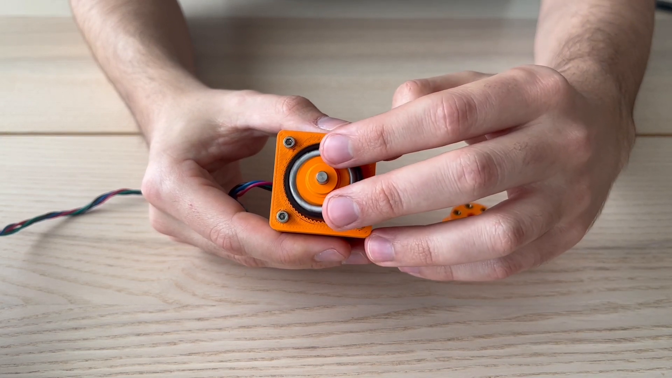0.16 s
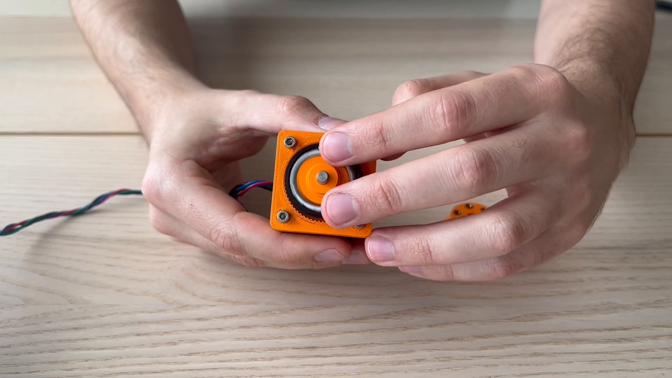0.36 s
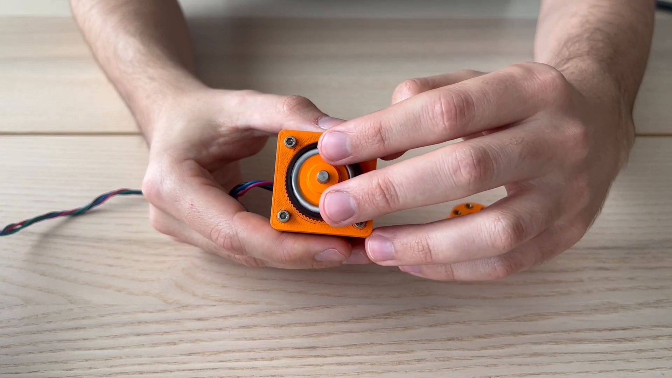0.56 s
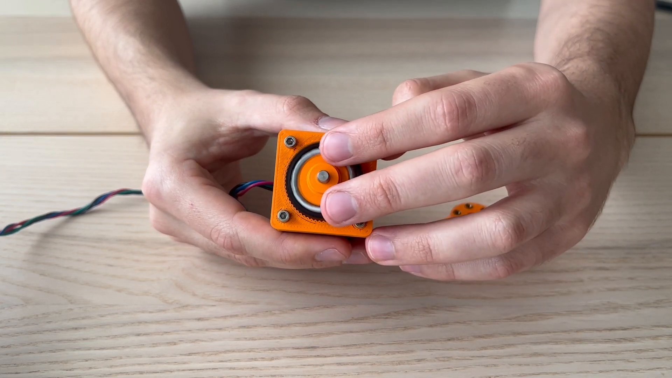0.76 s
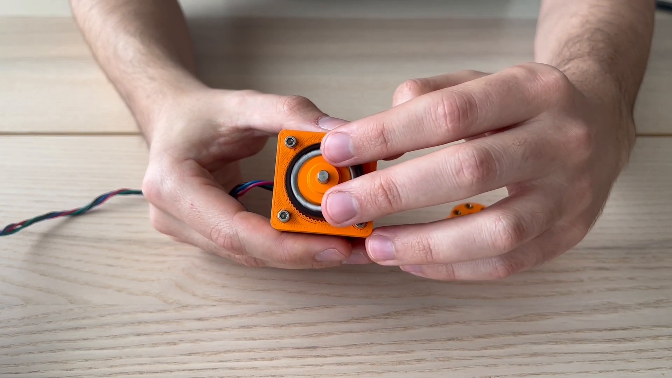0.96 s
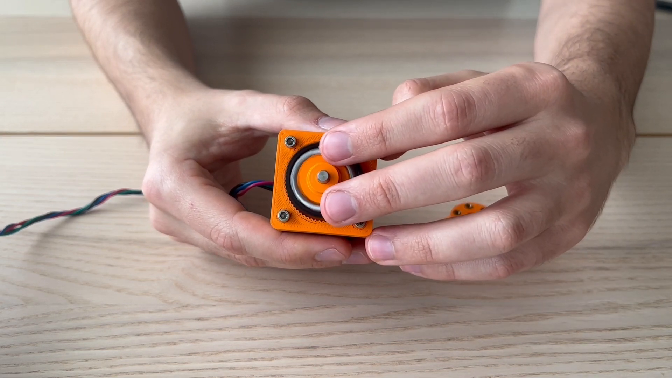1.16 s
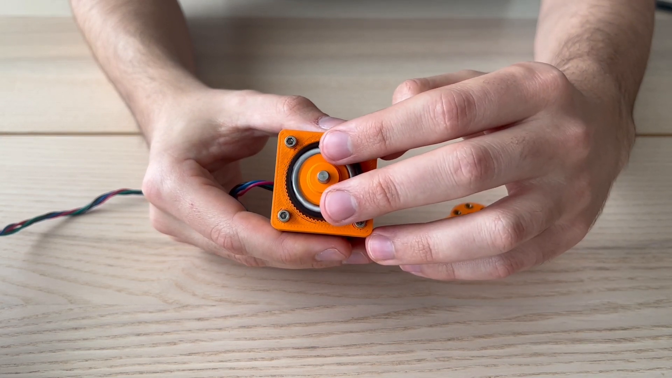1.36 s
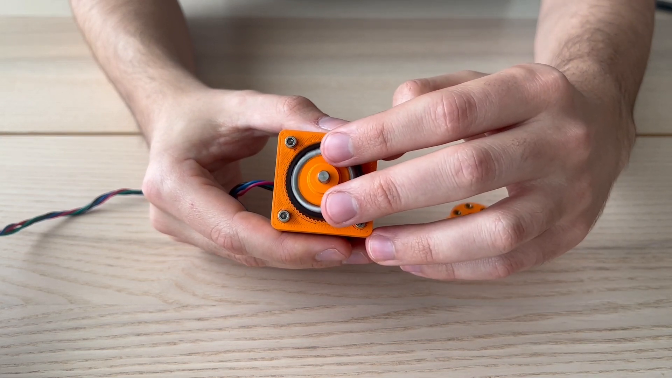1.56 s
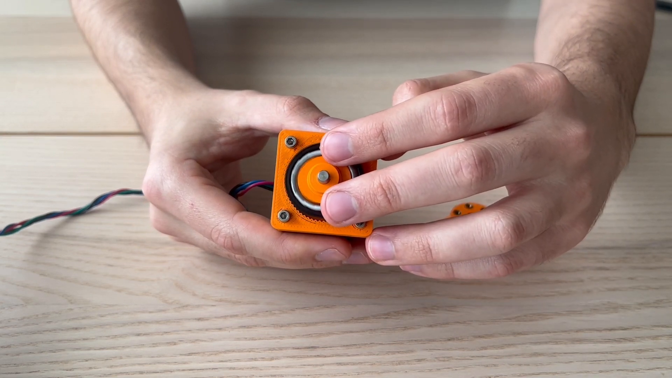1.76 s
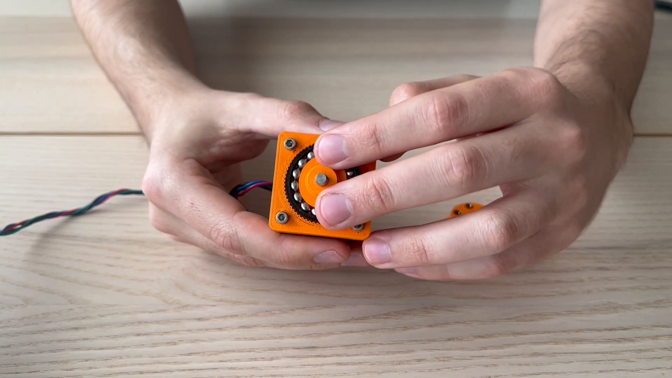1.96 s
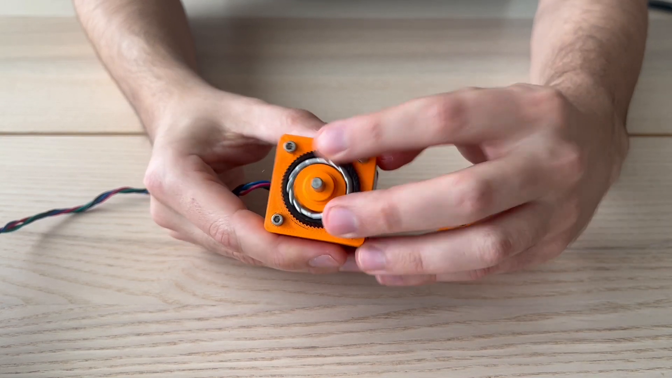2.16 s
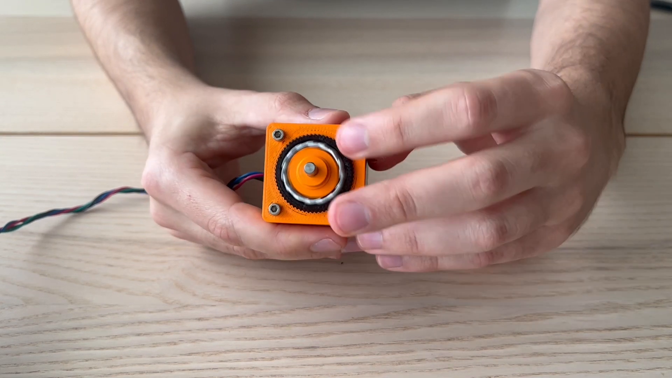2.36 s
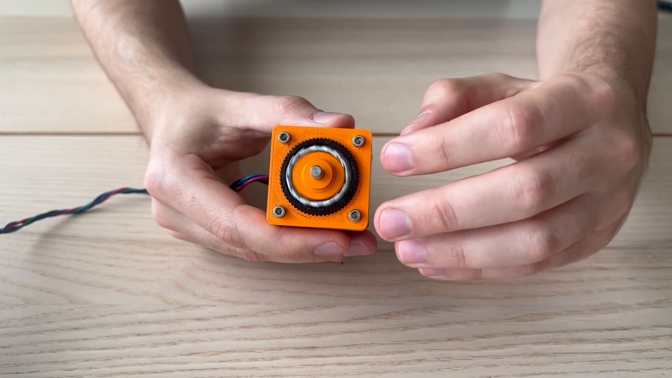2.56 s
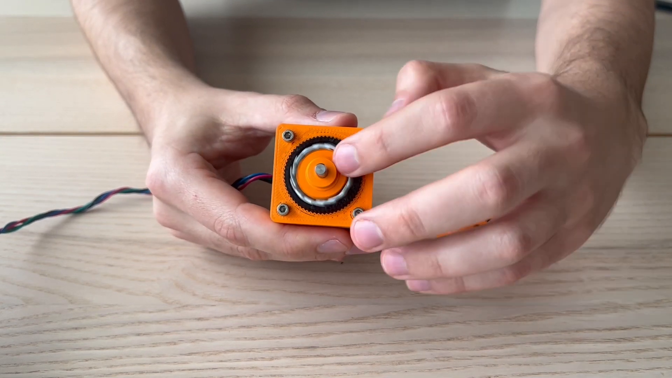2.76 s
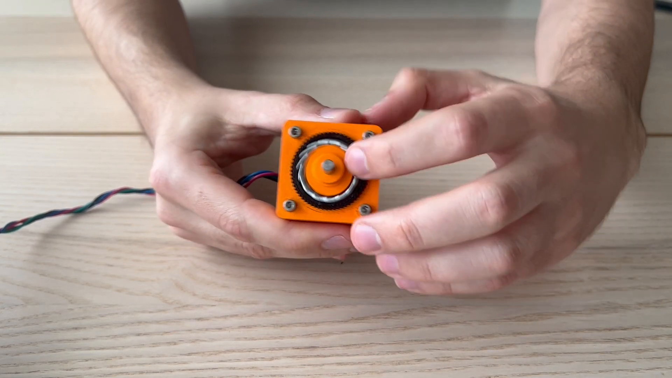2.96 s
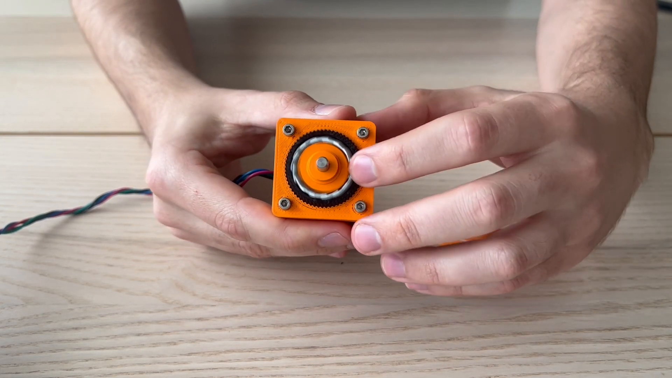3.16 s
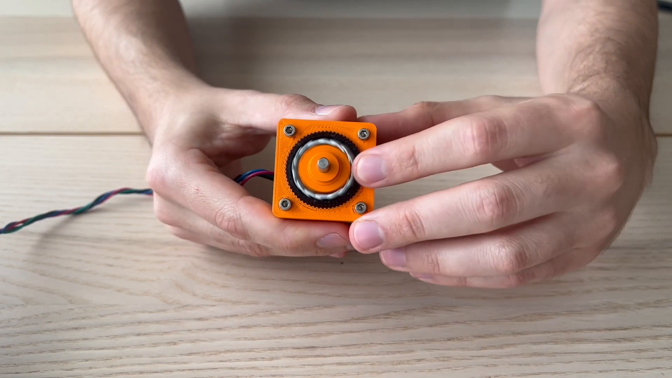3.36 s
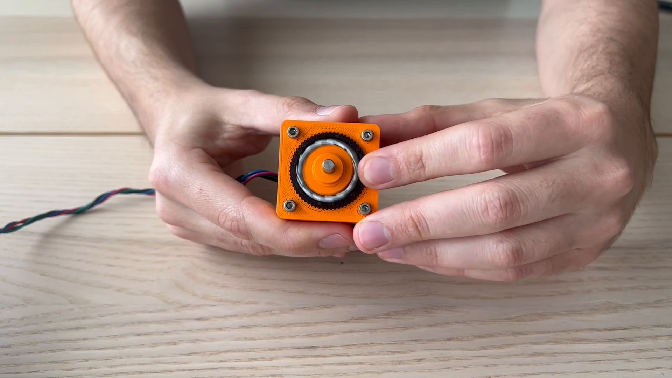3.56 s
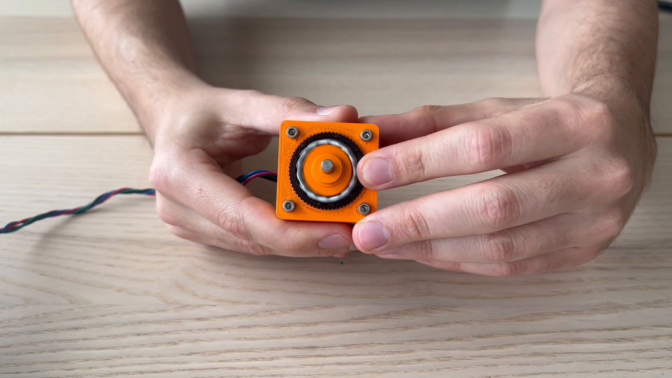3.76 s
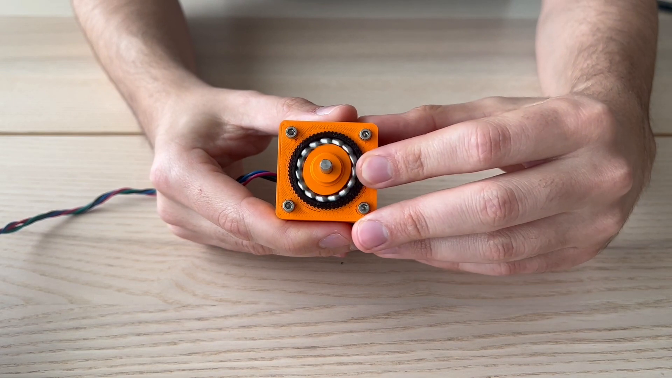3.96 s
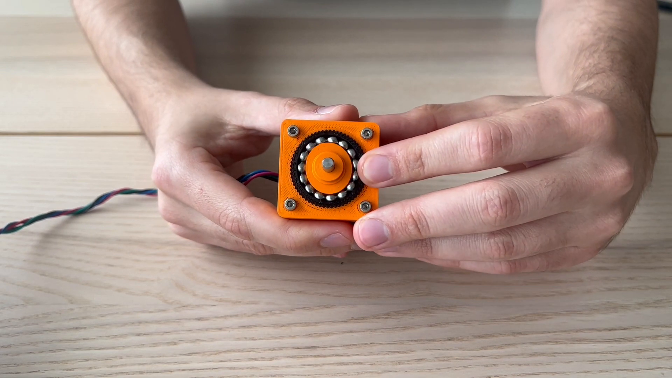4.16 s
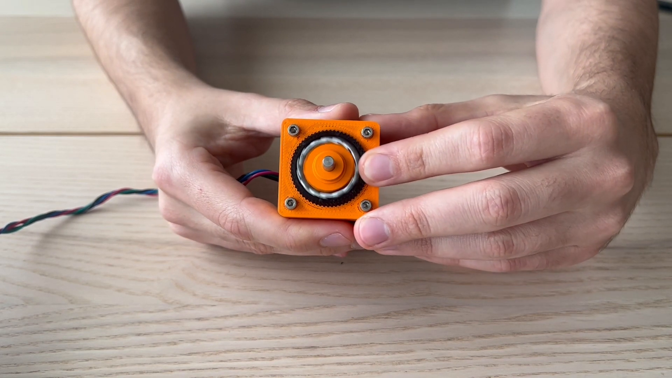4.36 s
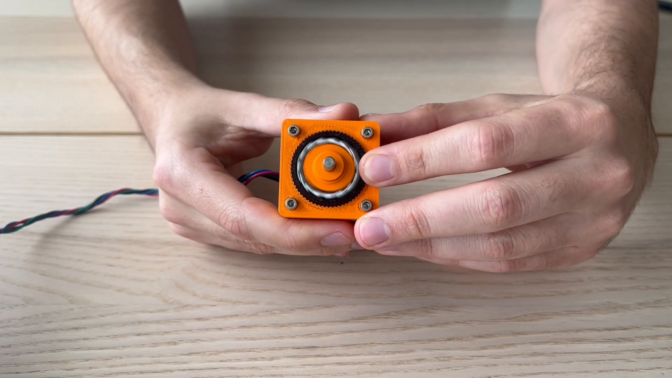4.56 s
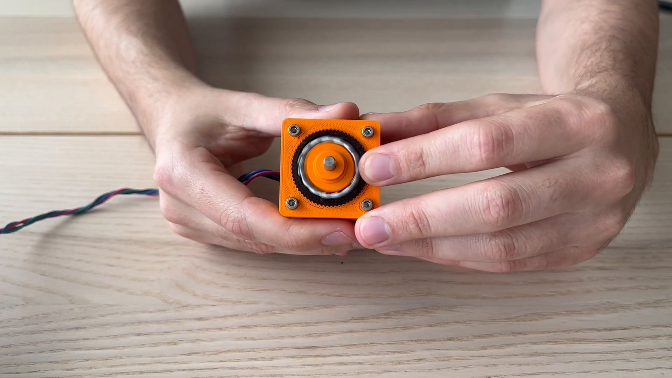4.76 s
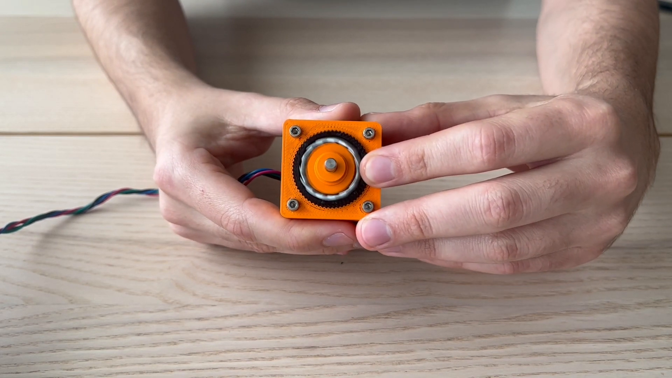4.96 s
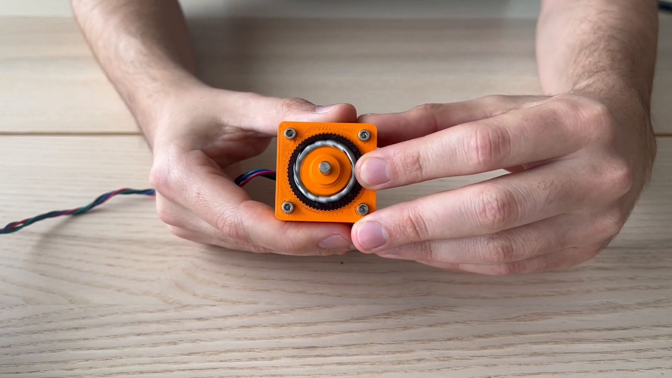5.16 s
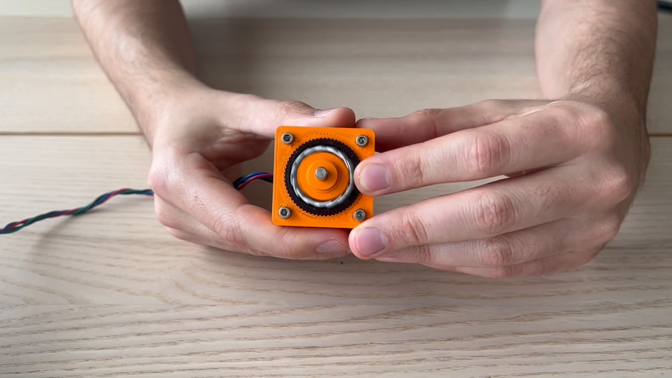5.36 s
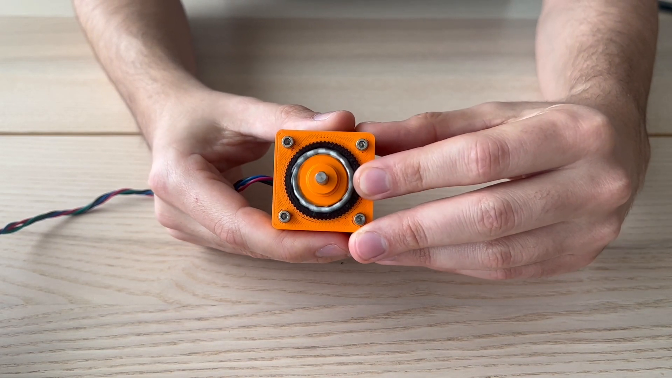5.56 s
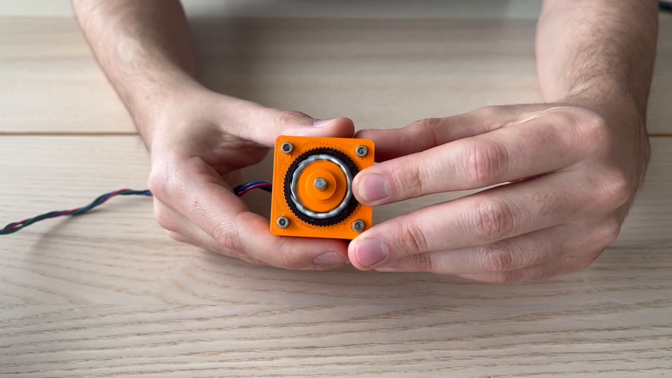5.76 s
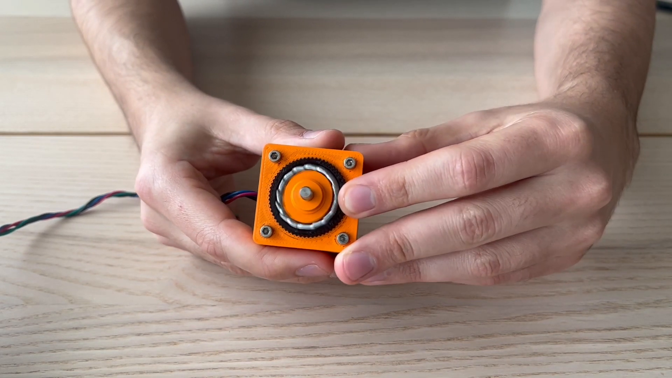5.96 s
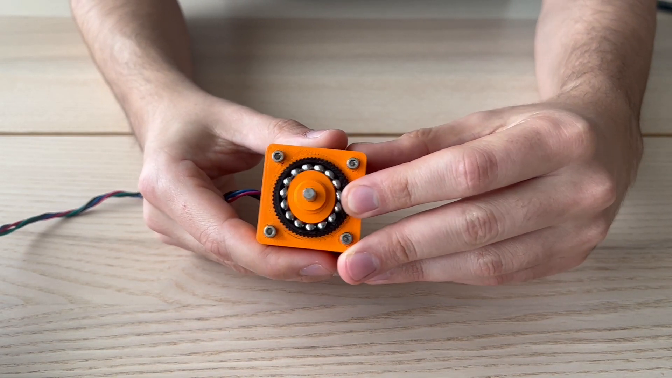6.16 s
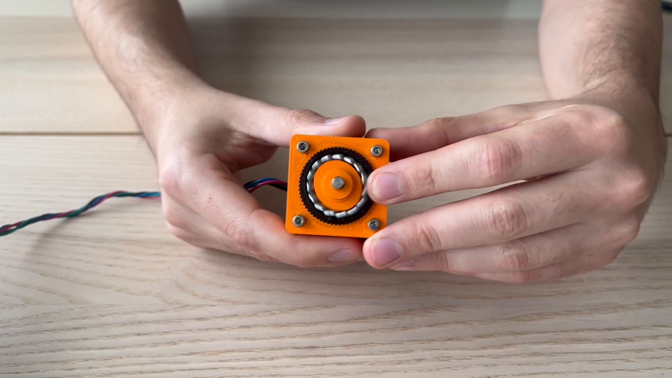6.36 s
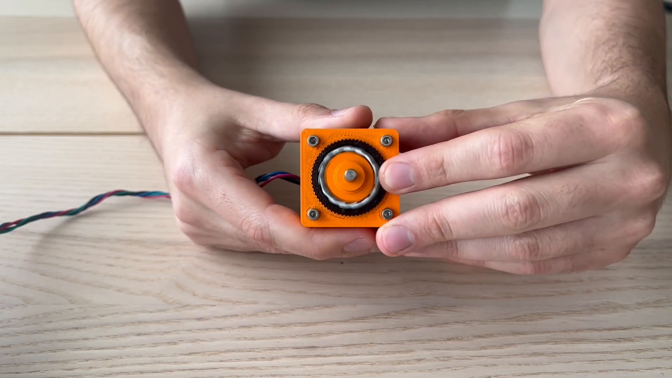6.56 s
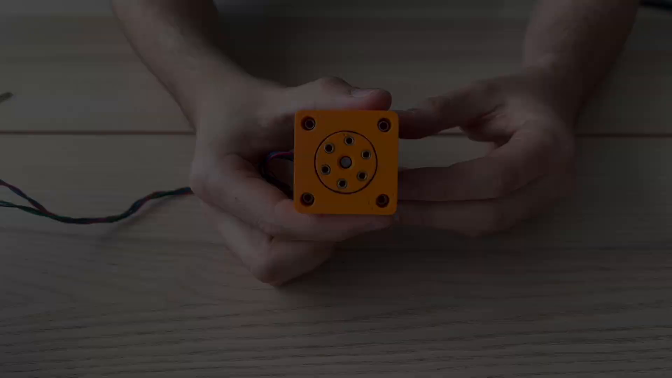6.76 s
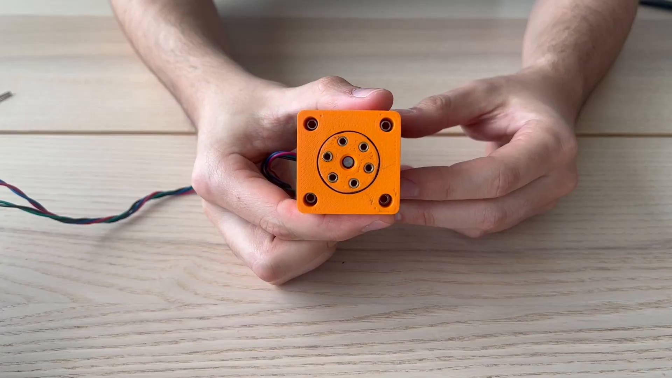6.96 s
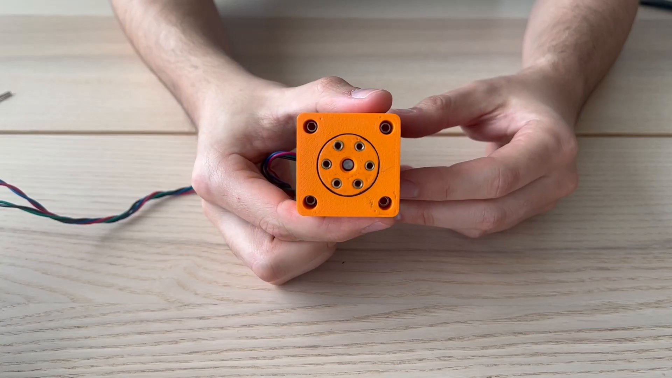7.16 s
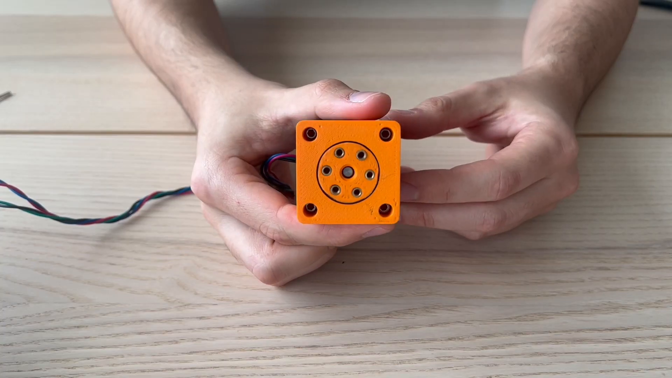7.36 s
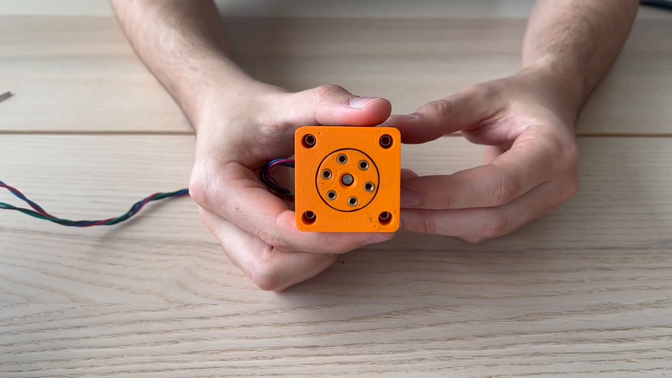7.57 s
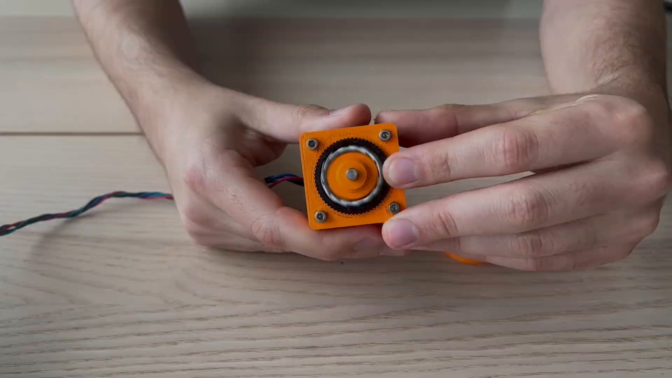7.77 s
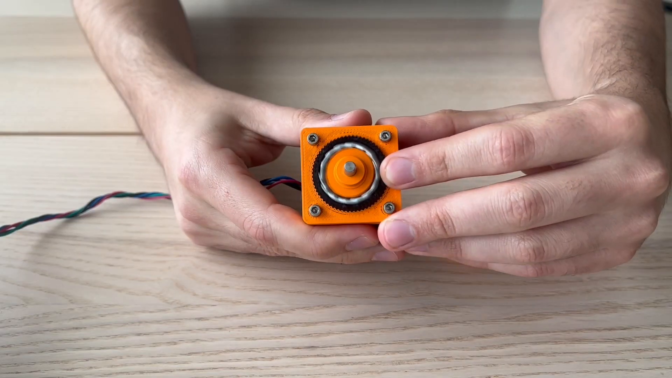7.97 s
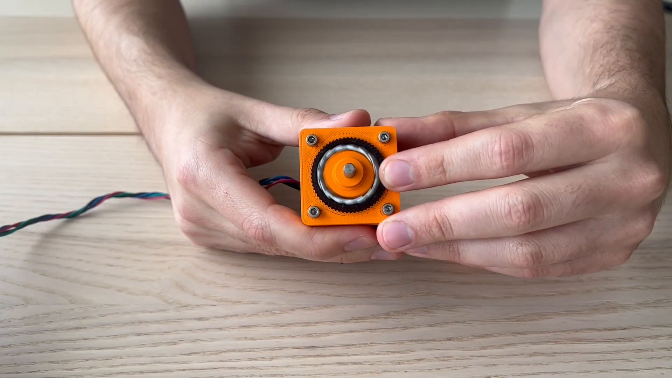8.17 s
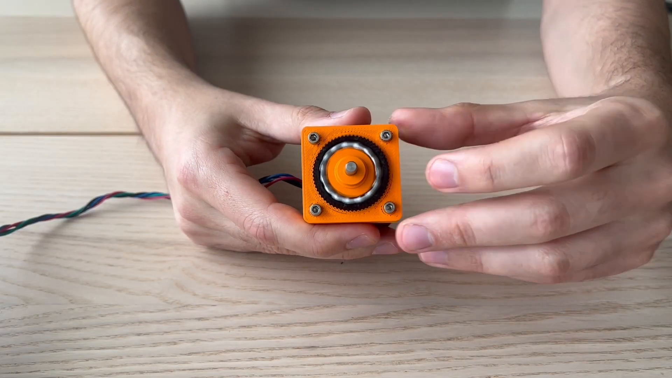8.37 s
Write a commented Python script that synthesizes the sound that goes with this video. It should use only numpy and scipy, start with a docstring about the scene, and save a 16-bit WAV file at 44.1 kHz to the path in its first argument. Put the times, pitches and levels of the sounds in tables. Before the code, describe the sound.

A small motor spins a plastic ball gearbox back and forth, steel balls rattling and clacking over a whine, then two short, quieter runs.

```python
"""Indoors, in a humming room, a two-port microphone close to an open plastic ball gearbox. A hand-held
stepper motor spins it back and forth: loose steel balls rattle and clack twice a turn, play in the gear
knocks the case, the coils whine. Some sound bounces off hands and table. Two short scenes follow:
the gearbox with its lid on, running fast, then an open, slow and quiet run."""
import sys
import numpy as np
from scipy import signal
from scipy.fft import rfft, irfft, next_fast_len
from scipy.io import wavfile
from scipy.ndimage import uniform_filter1d

SR = 44100
rng = np.random.default_rng(int(sys.argv[2]) if len(sys.argv) > 2 else 0)


def persist_wave(psi):
    """Save psi, clipped to +-1, as 16-bit WAV."""
    counts = np.round(np.clip(psi, -1, 1) * 32767).astype(np.int16)
    wavfile.write(sys.argv[1], SR, np.atleast_2d(counts).T)


N = 371322
TIME, FFT_SIZE = np.arange(N) / SR, next_fast_len(N + 4096)
FREQ = np.fft.rfftfreq(FFT_SIZE, 1 / SR)

SHAFT_HZ = 17.126  # at full speed
FIRST_STOP_S, RUN_S, RAMP_S = -.24, 2.14, .31  # the shaft brakes evenly and turns back every RUN_S

# one row per run between stops: (throb phase [rad], throb depth [dB], body rattle [dB],
# step whine at start [dB], at end [dB], upper twin tone [dB], coil tones [dB])
RUNS = [(3.05, 0.7, -18.5, -42, -44, -10, -43), (3.2, 1, -15, -43, -51, -7, -39),
        (4.9, 2.5, -13.5, -53, -53.5, 1.5, -41), (7.8, 0.5, -13.5, -50.5, -48, 4, -46)]
# rattle at full speed, as the fingers damp or free the gear: (time [s], level [dB])
RATTLE_LEVEL = [(0, -40), (.16, -31.5), (.3, -34.5), (.55, -33.5), (.88, -38), (.93, -32.5), (1.58, -36),
                (1.67, -36.5), (1.83, -24), (1.9, -28), (1.96, -21.5), (2.02, -28.5), (2.06, -20),
                (2.25, -23.5), (2.65, -23), (3.0, -24), (3.75, -24.5), (4.21, -28.5), (4.45, -28),
                (4.75, -28), (5.0, -28.5), (5.2, -27), (5.86, -28), (6.05, -27.5), (6.3, -26), (6.45, -26),
                (6.7, -26), (6.77, -28.5), (6.9, -58)]
# ring of the steel balls: (frequency [Hz], gain [dB])
BALL_COLOUR = [(5000, -17.5), (6500, -9.5), (8200, -6.5), (9600, 1.5), (10400, 0.5), (11500, 2), (12800, 3),
               (15000, 1)]
# ring of the plastic body: (frequency [Hz], gain [dB])
BODY_COLOUR = [(500, -14.5), (750, -12.5), (1100, -7), (1350, -9.5), (1880, -7), (2050, -0.5), (2300, -3.5),
               (3200, 0), (3420, 1.5), (3750, 1.5), (4100, -3), (4600, -7), (6200, -1), (8000, -1),
               (10000, -11)]
# balls tumble over while the shaft creeps: (time [s], level [dB], decay [s])
TUMBLES = [(1.859, -30, 0.013), (1.941, -30.5, 0.0062), (2.0415, -7, 0.0063), (5.921, -29, 0.005),
           (6.011, -27, 0.0067), (6.112, -43, 0.02), (6.144, -35.5, 0.0072), (6.207, -33, 0.013)]
# hard clacks, often two or three to a half turn: (time [s], strength [dB])
HARD_CLACKS = [(1.9434, -27), (2.0421, 2), (2.1397, -10), (2.2188, -21), (2.2562, -21), (2.2628, -13),
               (2.3207, -13), (2.433, -15), (2.4382, -9), (2.4965, -7), (2.5048, -17), (2.5274, -16),
               (2.5575, -19), (2.614, -15), (2.6712, -15), (2.7783, -17), (2.819, -19), (2.8705, -16),
               (2.8884, -22), (2.98, -22), (2.991, -15), (3.0171, -18), (3.0215, -17), (3.0897, -17),
               (3.0973, -17.5), (3.1361, -19), (3.3082, -18), (3.3153, -18), (3.4778, -21), (3.4867, -24),
               (3.5957, -27), (3.6634, -24), (3.7186, -18), (3.7533, -23), (3.8209, -23), (3.871, -25),
               (3.8767, -28), (3.8956, -27), (3.9703, -25), (3.9741, -29), (4.001, -24.5), (4.0057, -24),
               (4.068, -30), (4.0786, -30), (4.0926, -32), (4.12, -31), (4.1922, -25.5), (4.2137, -33),
               (4.2243, -34), (4.233, -25), (4.2434, -30), (4.2624, -28), (4.2691, -31), (4.2812, -26),
               (4.337, -24), (4.3447, -28), (4.3953, -22), (4.4056, -20.5), (4.4455, -22), (4.4539, -21),
               (4.4648, -19), (4.4932, -25), (4.5432, -24.5), (4.5663, -27), (4.5763, -25), (4.5974, -23),
               (4.6305, -20.5), (4.6853, -16), (4.6887, -20.5), (4.7017, -21), (4.7162, -15.5),
               (4.7479, -20), (4.7787, -19), (4.8032, -25), (4.8094, -19), (4.838, -21), (4.8423, -29),
               (4.8643, -16.5), (4.8722, -23), (4.8957, -23), (4.9217, -23), (4.929, -25), (4.9577, -28),
               (4.9819, -27), (4.9876, -28), (5.0161, -24), (5.0369, -25), (5.0411, -24), (5.0733, -19),
               (5.1271, -20), (5.1568, -15), (5.184, -16.5), (5.1941, -24), (5.222, -15.5), (5.2455, -15.5),
               (5.2572, -31), (5.2724, -22), (5.2804, -19), (5.3076, -21), (5.3332, -19), (5.3994, -28),
               (5.454, -18), (5.4732, -21), (5.4796, -24), (5.5058, -16.5), (5.5367, -17), (5.5676, -18.5),
               (5.5722, -21), (5.5955, -18), (5.603, -25), (5.6234, -18), (5.6306, -17.5), (5.6883, -16),
               (5.7164, -28), (5.741, -22), (5.7786, -23), (5.7985, -19), (5.826, -17), (5.865, -18),
               (5.8869, -16), (5.8955, -20), (5.9221, -26), (5.9303, -12.5), (5.9359, -30), (5.9563, -26),
               (5.961, -18), (5.9711, -19), (6.0106, -19), (6.0255, -19), (6.0902, -14), (6.1196, -29),
               (6.1403, -23.5), (6.147, -32), (6.2025, -26), (6.2082, -20), (6.2161, -25), (6.2208, -28),
               (6.2394, -27), (6.2433, -26), (6.2501, -32), (6.278, -31), (6.3142, -26), (6.3256, -25),
               (6.4051, -28), (6.413, -27), (6.445, -19), (6.4535, -19), (6.6187, -18), (6.6461, -20),
               (6.6572, -18), (6.684, -20), (6.7039, -24), (6.7321, -22)]
# neighbours jostle after a snap, more as the cage runs loose: (time [s], jostle [dB], leading tick [dB])
JOSTLE = [(0, -26, 6), (2.1, -26, 6), (2.3, -21, 14), (3.9, -24, 11), (4.4, -10, 0), (5.8, -9.5, 0),
          (5.9, -18, 4), (6.2, -19, 0)]
# stretches of regular soft clacks and knocks: (start [s], end [s], clack strength [dB], knock lag [s])
BEATS = [(2.2613, 3.85, -26, .0005), (4.3371, 5.87, -26, .007), (6.4454, 6.76, -29, .05)]
# knocks on the case, hardest around the stops: (time [s], strength [dB])
KNOCKS = [(1.942, -26), (2.042, -9), (2.258, -49), (2.312, -39), (2.379, -35), (2.438, -31), (2.496, -27.5),
          (2.551, -38), (2.612, -44), (2.661, -37), (2.719, -39), (2.841, -47), (2.897, -36), (2.961, -37),
          (3.013, -35), (3.072, -42), (3.165, -41), (3.249, -36), (4.075, -45), (4.693, -45),
          (4.754, -41.5), (4.811, -41), (4.866, -42), (5.043, -40), (5.162, -36), (5.221, -32),
          (5.28, -35.5), (5.454, -36), (5.513, -34), (5.571, -32.5), (5.629, -35), (5.689, -35),
          (5.805, -36), (5.864, -36), (5.923, -36), (5.931, -28), (6.023, -30.5), (6.324, -40),
          (6.785, -42)]
# modes of the case: (frequency [Hz], gain [dB], t60 [s])
CASE_MODES = [(485, -2, 0.03), (658, 5, 0.015), (753, 5, 0.026), (968, 6, 0.022), (1130, 2, 0.024),
              (274, -15, 0.07), (136, -9.5, 0.074)]
# the grip damps or frees the middle case modes: (time [s], gain [dB])
GRIP = [(2.04, -1), (2.2, -10), (3.85, -7), (4.2, 5.5), (6.8, -3)]
# coil tones: (frequency [cycles per turn], level [dB])
COIL_TONES = [(50, -27), (150, -22), (217.5, -17), (250, -19), (300, -29), (350, -24), (400, -18),
              (401, -17), (550, -11), (600, -17), (700, -15), (750, -13)]
# frame resonances that the step whine glides through: (speed [share of full], gain [dB])
FRAME_GAIN = [(0, -45), (.5, -24), (.6, -9), (.67, -16), (.76, -19), (.83, -7), (.89, -20), (.94, -6),
              (1, 0)]
# lid on: (time [s], grind [dB], hum [dB])
LID_LEVELS = [(6.75, -22, -48), (6.85, -47, -55), (6.905, -42, -53), (6.925, -58, -48), (6.955, -45.5, -39),
              (7.0, -43.5, -45), (7.11, -36, -73), (7.3, -37, -65), (7.67, -35.5, -63), (7.76, -43, -61),
              (7.85, -44, -71)]
# grind heard through the lid: (frequency [Hz], gain [dB])
LID_COLOUR = [(71, -56), (120, -14), (147, 1), (282, -4.5), (451, -2), (499, -5.5), (735, -5), (1150, -6),
              (1550, -3.5), (1900, -5), (2340, -11), (2750, -9), (5630, -5.5), (6100, -4.5), (6900, -8),
              (11500, -10), (12700, -11.5), (15600, -9.5)]
# lid-on whine at full speed: (frequency [Hz], level [dB])
LID_TONES = [(1534, -60), (3908, -64), (5900, -54), (5927, -53), (5959, -50), (8619, -66), (9717, -67),
             (11854, -63), (13340, -65)]
# lid-on spin-up: (time [s], speed [share of full])
LID_SPEED = [(6.93, .12), (7.105, 1), (8, 1)]
# taps inside the closed box: (time [s], strength [dB])
LID_TAPS = [(7.0903, -31), (7.1167, -30), (7.1561, -33), (7.1965, -34), (7.2245, -32), (7.2903, -36),
            (7.3182, -34), (7.3976, -44), (7.412, -37), (7.4315, -26.5), (7.4524, -32), (7.5013, -35),
            (7.5203, -41), (7.5353, -45), (7.5557, -40), (7.5896, -34), (7.6081, -41), (7.624, -35),
            (7.659, -29), (7.6914, -35)]
# modes of the closed box: (frequency [Hz], gain [dB], t60 [s])
LID_MODES = [(830, -6.5, 0.023), (1550, 0.5, .016), (1910, -3, .014), (2710, -9, .01)]
# slow run: (time [s], hum [dB], step tones [dB])
SLOW_LEVELS = [(7.76, -63, -66), (7.78, -78, -68), (7.892, -55, -52), (7.924, -61, -55), (8.056, -71, -54),
               (8.088, -54, -61), (8.112, -47.5, -54.5), (8.392, -71, -53), (8.42, -71, -59)]
# slow rolling: (frequency [Hz], gain [dB])
SLOW_COLOUR = [(40, -42), (71, -40), (120, -37), (150, -25), (226, -15.5), (368, -9.5), (499, -12.5),
               (1020, -17), (1500, -18), (3520, -25.5), (4590, -20.5), (6620, -27.5), (9360, -24),
               (11000, -19.5), (13200, -24), (15600, -22.5)]
# slow step tones: (frequency [Hz], level [dB])
SLOW_TONES = [(371.4, 2), (748, -6.5), (1125, -9), (1497, -6.5), (1868, -14), (12592, -20)]
# small ticks in the slow run: (time [s], strength [dB])
SLOW_TICKS = [(8.117, -38), (8.3265, -38), (8.3434, -41), (8.3504, -39), (8.3624, -31), (8.3744, -40),
              (8.386, -37), (8.3984, -41), (8.4103, -35)]
# modes those ticks ring: (frequency [Hz], gain [dB], t60 [s])
SLOW_MODES = [(3870, -2, .005), (4700, -0.5, .005), (5600, 2, 0.0045)]
# brief low tones: (time [s], frequency [Hz], level [dB], rise [s], fall [s])
BLIPS = [(6.96, 205, -45, .017, .03), (6.93, 290, -44, .012, .02), (6.93, 440, -43.5, .012, .02),
         (6.84, 480, -48, .02, .03), (7.22, 460, -42.5, .02, .03), (7.65, 856, -46, .01, .015),
         (7.82, 282, -46, .04, .12), (8.13, 345, -45, .03, .04), (8.25, 325, -46, .06, .08)]
# room tone: (time [s], hum [dB], rumble [dB])
ROOM_LEVELS = [(0, -48, -48), (.3, -38, -55), (.5, -48.5, -52), (1.0, -48, -52), (1.1, -60, -57.5),
               (1.8, -50, -54), (1.95, -54.5, -57), (2.8, -59, -57), (3.0, -46, -58), (3.16, -59, -56),
               (3.6, -53, -58), (3.91, -46.5, -54), (3.98, -55, -56), (4.66, -52, -52), (4.8, -45, -47),
               (5.55, -58, -58), (5.82, -48.5, -55), (6.1, -48.5, -47.5), (6.22, -74, -51),
               (6.85, -54, -52)]
# distant air noise: (frequency [Hz], gain [dB])
AIR_COLOUR = [(80, -9.5), (120, 2.5), (250, 0), (350, -3), (500, -10.5), (900, -13), (1500, -20),
              (2500, -24), (6000, -20.5), (15000, -20)]
# bounce off hands and table: (frequency [Hz], gain [dB])
BOUNCE_COLOUR = [(400, -11), (1000, 3), (2500, 0.5), (4000, 0.5), (6500, 2.5), (8200, -0.5), (10600, -5.5),
                 (11700, -51), (15000, -13.5)]
# close sound at the microphone: (frequency [Hz], left port's lead [rad])
PORT_PHASE = [(0, 0), (1980, 0), (3450, 2.4), (4310, 1.6), (4740, .2), (7150, -1.2), (8300, 0), (9650, 0),
              (10650, -np.pi), (11750, -np.pi), (12750, -2 * np.pi), (13650, -2 * np.pi),
              (14700, -3 * np.pi)]
# level gap between the ports: (frequency [Hz], left minus right [dB])
PORT_BALANCE = [(60, 2.5), (110, 2.0), (200, 2.5), (380, 3.0), (700, 2.5), (1290, 3.0), (2380, 2.5),
                (4400, 6.0), (8120, 0.5), (15000, 0.0)]
# sound from all round at the two ports: (frequency [Hz], likeness [0-1])
PORT_LIKENESS = [(60, 0.3), (130, 0.94), (290, 0.77), (640, 0.4), (1410, 0.53), (3100, 0.5), (6820, 0.08),
                 (15000, 0.5)]


def open_gearbox():
    """Close to the microphone: the shaft's stop-and-go motion drives the rattle and the whine."""
    run, since_stop = np.divmod(TIME - FIRST_STOP_S, RUN_S)
    nearest_stop_s = np.minimum(since_stop, RUN_S - since_stop)
    speed = np.minimum(nearest_stop_s / RAMP_S, 1)
    turns = np.cumsum(SHAFT_HZ * speed) / SR
    settings = np.array(RUNS)[np.minimum(run.astype(int), len(RUNS) - 1)].T
    rattle = ball_rattle(speed, turns, nearest_stop_s, *settings[:3])
    whine = motor_whine(speed, turns, since_stop, *settings[3:])
    return close_pickup(rattle[0] + ball_clacks() + case_knocks() + whine, bounced=rattle[1:])


def ball_rattle(speed, turns, nearest_stop_s, throb_phase, depth_db, body_db):
    """Loose balls throb twice a turn with the oval cam: one direct signal, then two for the bounce."""
    throb_db = depth_db * np.cos(4 * np.pi * turns + throb_phase)
    still_db = -10.5 * np.exp(-(nearest_stop_s / .032) ** 2)  # the balls settle at each stop
    roll = undb(curves(RATTLE_LEVEL)[0] - 13 * (1 - speed) + still_db)
    tumble = sum(undb(db) * swell(s, decay / 3, decay) for s, db, decay in TUMBLES)
    uneven = undb(1.5 * walk(150) + 1.36 * walk(16)) * span(-1, 6.8, .049)
    pushes = np.array([impacts(2500, 3.63, .97), *rng.standard_normal((2, N))])
    balls = roll * undb(throb_db) + tumble
    body = roll * undb(body_db - 3 * (1.5 - speed) + .35 * throb_db) + tumble * undb(-13.5)
    return uneven * (unit(colour(pushes, BALL_COLOUR)) * balls + unit(colour(pushes, BODY_COLOUR)) * body)


def ball_clacks(snap_s=.001, jostle_lag_s=.0031, jostle_s=.0056):
    """Balls snap over a tooth: one hard tick leads a short cluster from the neighbours."""
    when, db, _ = beats(per_turn=2).T
    jitter, scatter = rng.standard_normal((len(when), 2)).T
    soft = np.transpose([when + .00083 * jitter, db + 4 * scatter])
    tick = impulses(np.vstack([HARD_CLACKS, soft[clear_of(when, HARD_CLACKS, gap_turns=.25)]]))
    lag = np.arange(-1000, 1001) / SR
    snap_shape = np.exp(np.where(lag < 0, .79 * lag, -lag) / snap_s)
    jostle_shape = np.exp(-((lag - jostle_lag_s) / jostle_s) ** 2)
    jostle_db, lead_db = curves(JOSTLE)
    burst = signal.fftconvolve(tick, snap_shape, "same")
    burst += undb(jostle_db) * signal.fftconvolve(tick, jostle_shape, "same")
    snap = impacts(7000, 2.2, .7) * burst + undb(lead_db) * tick
    return undb(2.5) * colour(snap, BALL_COLOUR) + undb(-13) * colour(snap, BODY_COLOUR)


def case_knocks(lead_s=.0011, tail_t60=.26):
    """Play in the gear gives the plastic case a soft push about once a turn; the table rings on."""
    beat, _, lag = beats(per_turn=.99).T
    beat = beat + lag
    faint = np.transpose([beat, -48 + 2 * rng.standard_normal(len(beat))])
    when, peak_db = np.vstack([KNOCKS, faint[clear_of(beat, KNOCKS, gap_turns=.5)]]).T
    push = lambda db: np.convolve(impulses(zip(when - lead_s, db)), np.hanning(30) / 14.5)[:N]
    high = push(peak_db)
    middle = high * undb(curves(GRIP)[0])
    low = push(peak_db + .26 * (peak_db - peak_db.max()))  # softer blows lose extra bass
    case = undb(-6) * sum((-1) ** k * undb(db) * ring(low if hz < 550 else middle if hz < 850 else high,
                                                      hz, t60)
                          for k, (hz, db, t60) in enumerate(CASE_MODES))
    age = TIME[:SR // 3]
    tail = rng.standard_normal(len(age)) * undb(-60 * age / tail_t60)
    return case + undb(-19) * signal.fftconvolve(case, tail / np.linalg.norm(tail))[:N]


def motor_whine(speed, turns, since_stop, start_db, end_db, twin_db, coil_db):
    """The stepper's coils sing at multiples of the shaft rate, with twin tones around 200 a turn."""
    step_db = start_db + (end_db - start_db) * since_stop / RUN_S
    step_db += np.interp(speed, *np.transpose(FRAME_GAIN))
    twins = tones([(199, 0)], turns, 2.4) + undb(twin_db) * tones([(201, 0)], turns, 4.5)
    whine = undb(step_db) * twins
    whine += undb(coil_db - 55 * (1 - speed)) * tones(COIL_TONES, turns, 3)
    # on braking, side tones at half and double the step rate swell through a case resonance
    braking = (since_stop > RUN_S / 2) * undb(end_db - 8)
    resonance = lambda at_speed: np.exp(-((speed - at_speed) / .081) ** 2)
    whine += braking * resonance(.65) * tones([(100, -6)], turns, 3)
    whine += braking * resonance(.59) * tones([(400, -2)], turns, 3.7)
    return whine * span(.061, 6.72, .12)


def lidded_gearbox():
    """The closed box runs fast: a duller grind, taps and a high step whine over hum and rumble."""
    grind_db, hum_db = curves(LID_LEVELS)
    speed = curves(LID_SPEED)[0]
    flutter = undb(1.9 * walk(45))
    mid, side = (undb(grind_db) * unit(colour(impacts(3000, 3.8, 1.3) * flutter, LID_COLOUR))
                 for _ in range(2))
    whine = tones(LID_TONES, np.cumsum(speed) / SR, 2.5) * undb(-10 * (1 - speed))
    whine *= span(7.065, 9, .04) * span(0, 7.7, .1)
    mid += whine + undb(-1.5) * taps(LID_TAPS, LID_MODES)
    mid += undb(hum_db) * (drone(162, .35) + .7 * drone(209, .13)) + undb(-54) * drone(86.7, .67)
    return diffuse_pickup(mid, side + .6 * whine, left_db=2.5) * span(6.84, 7.73, .075)


def slow_gearbox():
    """The open box turns slowly: soft rolling, small ticks, low step tones and a hum."""
    hum_db, tone_db = curves(SLOW_LEVELS)
    mid, side = (undb(-43) * unit(colour(impacts(4000, 1.5, 1.5), SLOW_COLOUR)) for _ in range(2))
    mid += undb(1) * taps(SLOW_TICKS, SLOW_MODES)
    mid += undb(tone_db) * tones(SLOW_TONES, TIME, 4.7)
    mid += undb(hum_db + 1.5 * walk(10)) * hum(158, 3.8)
    return diffuse_pickup(mid, side, left_db=1.8) * span(7.8, 9, .1)


def blips():
    """Brief low tones in the two short scenes, a little left of centre."""
    x = sum(undb(db) * swell(s, rise, fall) * np.sin(2 * np.pi * hz * TIME)
            for s, hz, db, rise, fall in BLIPS)
    return x * undb([[1.2], [-1.2]])


def room_tone():
    """Behind the first scene: distant air noise, a wavering hum and deep rumble."""
    hum_db, rumble_db = curves(ROOM_LEVELS)
    air_gain = undb(-47 + .24 * walk(3.3))
    mid, side = (air_gain * unit(colour(rng.standard_normal(N), AIR_COLOUR)) for _ in range(2))
    mid += undb(hum_db + 2.5 * walk(14)) * (hum(153.6, 3.12) + .26 * drone(295.3, .11))
    mid += undb(rumble_db) * (drone(56.8, .52) + .91 * drone(85, .15))
    return diffuse_pickup(mid, side, left_db=2.9) * span(-1, 6.78, .25)


def close_pickup(source, bounced):
    """The two ports hear a near source with a phase and level gap; bounced sound arrives unrelated."""
    gain, lead = undb(per_bin(PORT_BALANCE) / 2), np.exp(.5j * per_bin(PORT_PHASE))
    direct = rfft(source, FFT_SIZE) * np.array([lead, 1 / lead])
    bounce = rfft(colour(bounced, BOUNCE_COLOUR), FFT_SIZE)
    return irfft((direct + bounce) * np.array([gain, 1 / gain]), FFT_SIZE)[:, :N]


def diffuse_pickup(mid, side, left_db):
    """Sound from all round reaches the ports most alike in the upper bass, less so in the treble."""
    likeness = np.clip(per_bin(PORT_LIKENESS), 0, .99)
    common = rfft(mid, FFT_SIZE) * np.sqrt((1 + likeness) / 2)
    apart = rfft(side, FFT_SIZE) * np.sqrt((1 - likeness) / 2)
    pair = irfft(np.array([common + apart, common - apart]), FFT_SIZE)[:, :N]
    return pair * undb([[left_db / 2], [-left_db / 2]])


def impacts(per_s, spread_db, bed):
    """Random ball impacts of very uneven size over a bed of rolling noise."""
    chance, sign, size = rng.random((3, N))
    hits = (chance < per_s / SR) * np.sign(sign - .5) * undb(-spread_db * np.log(size + .0029))
    return unit(unit(hits) + bed * rng.standard_normal(N))


def beats(per_turn):
    """(time [s], clack strength [dB], knock lag [s]) at every beat of the turning shaft."""
    period = 1 / (per_turn * SHAFT_HZ)
    return np.array([(s, db, lag) for t0, t1, db, lag in BEATS for s in np.arange(t0, t1, period)])


def clear_of(when, events, gap_turns):
    """True for times more than gap_turns from every listed event."""
    return np.abs(when[:, None] - np.array(events)[:, 0]).min(axis=1) * SHAFT_HZ > gap_turns


def taps(blows, modes):
    """Short blows ring a few modes."""
    x = impulses(blows)
    return sum((-1) ** k * undb(db) * ring(x, hz, t60) for k, (hz, db, t60) in enumerate(modes))


def tones(table, cycles, waver_db):
    """Sines locked to a running phase, each wavering in level, slowly and in a quick grain."""
    return np.sqrt(2) * sum(undb(db + waver_db * (.35 * walk(12) + 1.3 * walk(120)))
                            * np.sin(2 * np.pi * (k * cycles + rng.random())) for k, db in table)


def hum(hz, drift_hz):
    """A low tone whose pitch drifts a little."""
    return np.sqrt(2) * np.sin(2 * np.pi * np.cumsum(hz + drift_hz * walk(6)) / SR)


def drone(hz, t60):
    """A wavering low tone: noise in one narrow resonance."""
    return unit(ring(rng.standard_normal(N), hz, t60))


def ring(x, hz, t60):
    """One damped mode."""
    radius, angle = np.exp(-np.log(1000) / (t60 * SR)), 2 * np.pi * hz / SR
    return signal.lfilter([np.sin(angle)], [1, -2 * radius * np.cos(angle), radius ** 2], x + 1e-18)


def colour(x, table):
    """Causal filter with the gains of a (frequency [Hz], gain [dB]) table, via the folded cepstrum."""
    bass_cut_db = -30 * np.log2(np.clip(table[0][0] / (FREQ + 1), 1, 64))
    cepstrum = irfft(np.log(undb(per_bin(table) + bass_cut_db)), FFT_SIZE)
    cepstrum[1:FFT_SIZE // 2] *= 2
    cepstrum[FFT_SIZE // 2 + 1:] = 0
    return irfft(rfft(x, FFT_SIZE) * np.exp(rfft(cepstrum)), FFT_SIZE)[..., :N]


def impulses(rows):
    """One sample for each (time [s], level [dB]) row."""
    x = np.zeros(N)
    for s, db in rows:
        x[int(s * SR)] = undb(db)
    return x


def walk(rate):
    """Random levels held 1 / rate s and smoothed twice."""
    held = np.repeat(rng.standard_normal(int(N / SR * rate) + 2), 8)
    smooth = uniform_filter1d(uniform_filter1d(held, 8), 8)
    return np.interp(TIME * rate * 8, np.arange(len(smooth)), smooth)


def swell(peak_s, rise, fall):
    """A peak with exponential flanks."""
    age = TIME - peak_s
    return np.exp(np.maximum(np.where(age < 0, age / rise, -age / fall), -30))


def span(start, end, fade):
    """A gain that fades in before start and out after end."""
    return np.clip((TIME - start) / fade + 1, 0, 1) * np.clip((end - TIME) / fade + 1, 0, 1)


def curves(table):
    """Each value column of a time table at every sample."""
    times, *columns = np.transpose(table)
    return [np.interp(TIME, times, column) for column in columns]


def per_bin(table):
    """A frequency table at every FFT bin."""
    hz, values = np.transpose(table)
    return np.interp(np.log(FREQ + 1), np.log(hz + 1), values)


def undb(db):
    return np.exp(np.log(10) / 20 * np.asarray(db))


def unit(x):
    return x / np.sqrt(np.mean(x ** 2))


def scene():
    """The open gearbox over the room tone, then the lid-on run and the slow run."""
    return open_gearbox() + room_tone() + lidded_gearbox() + slow_gearbox() + blips()


def record(dry, low_cut_hz=17, top_hz=15750):
    """The recorder drops the deepest bass, rounds the loudest peak and cuts the top."""
    low_cut = signal.butter(2, low_cut_hz, "high", fs=SR, output="sos")
    top_cut = signal.ellip(12, .2, 80, top_hz, fs=SR, output="sos")
    return signal.sosfilt(top_cut, np.tanh(signal.sosfilt(low_cut, dry)))


dry = scene()
out = record(dry)
persist_wave(out)
```